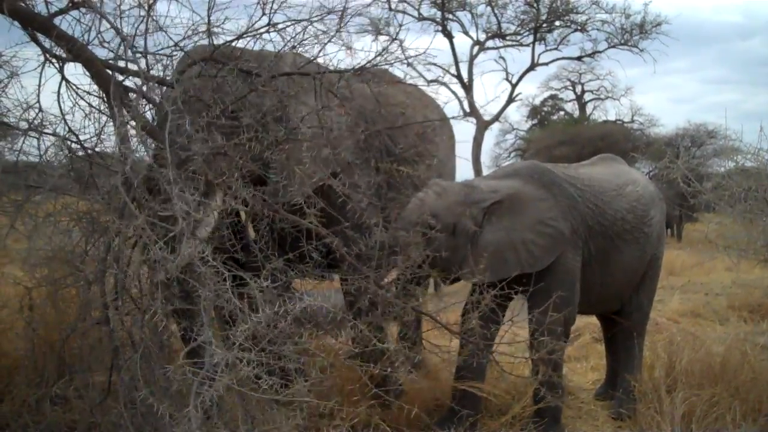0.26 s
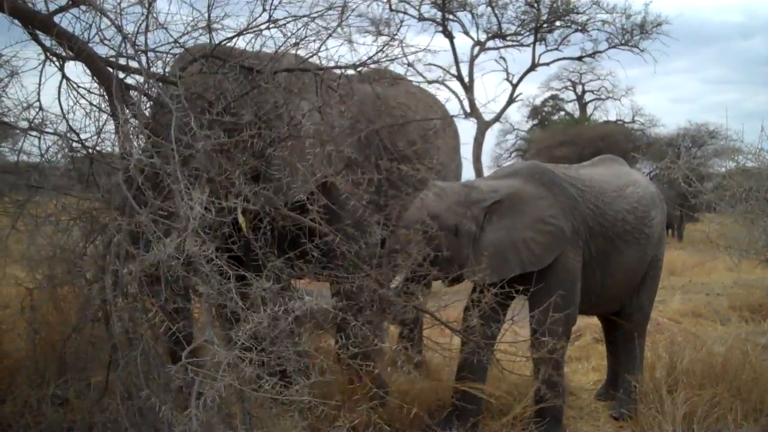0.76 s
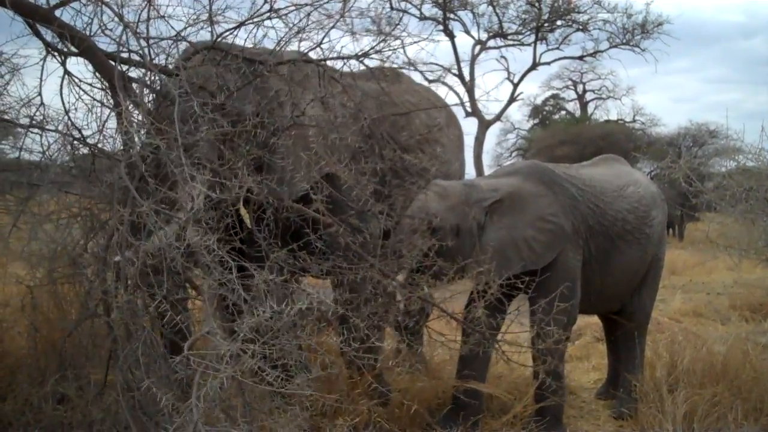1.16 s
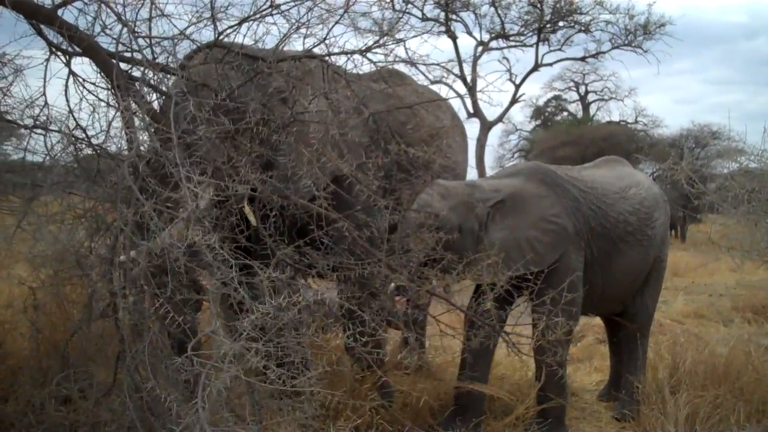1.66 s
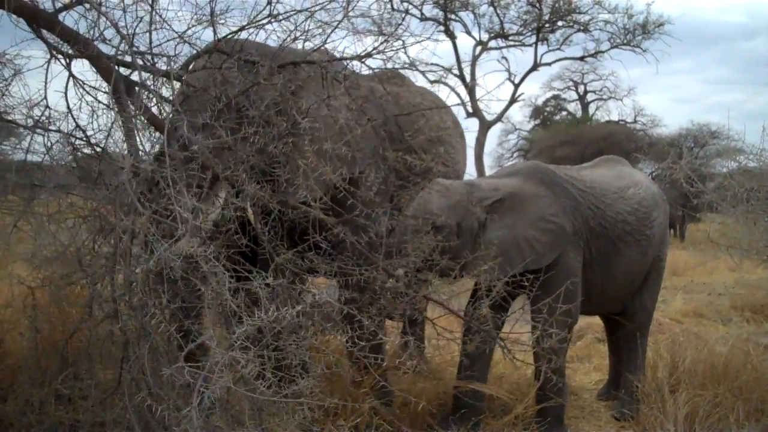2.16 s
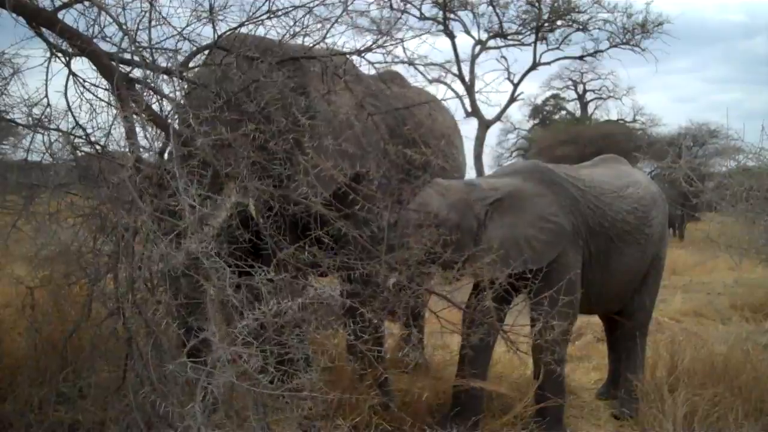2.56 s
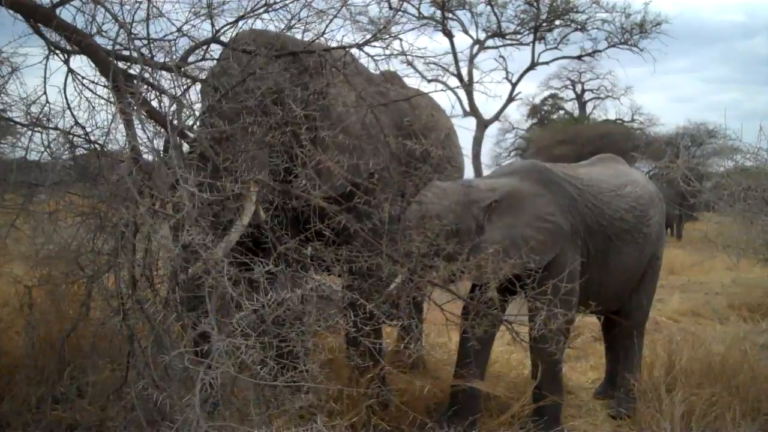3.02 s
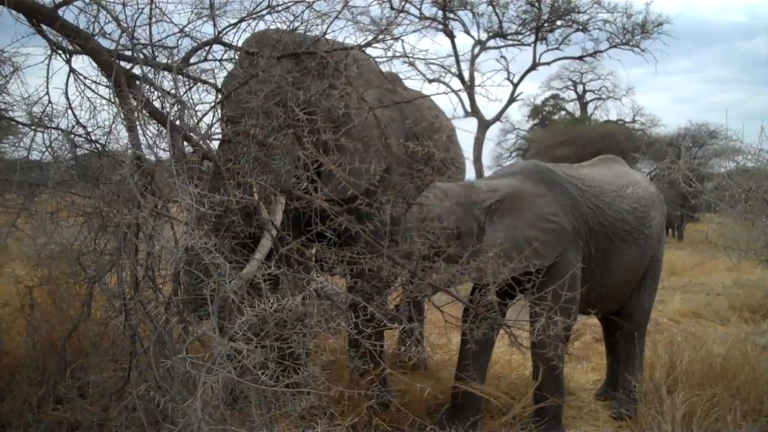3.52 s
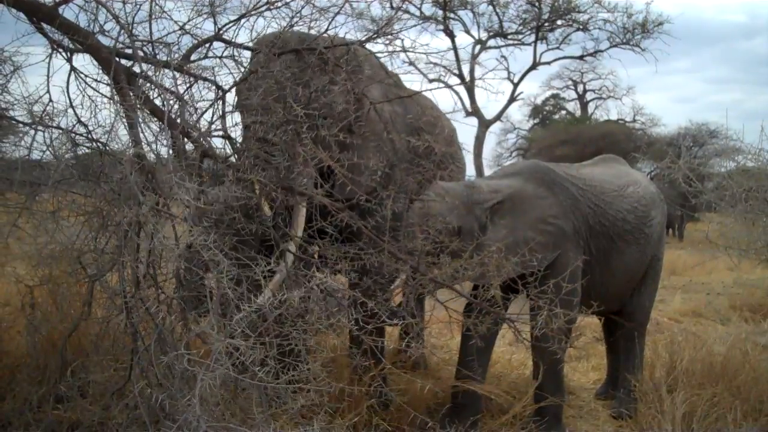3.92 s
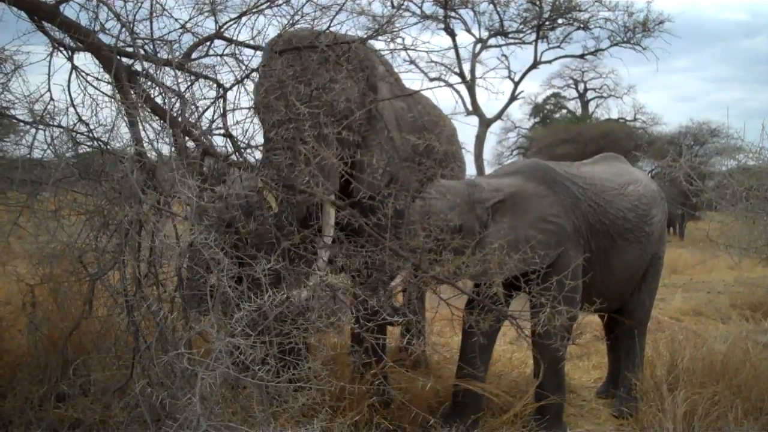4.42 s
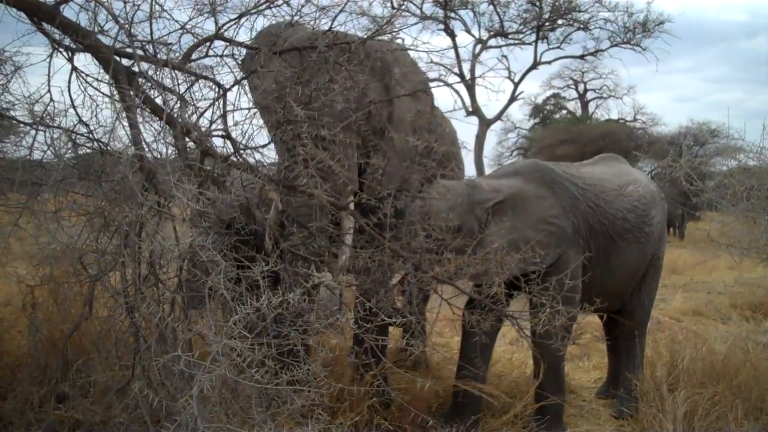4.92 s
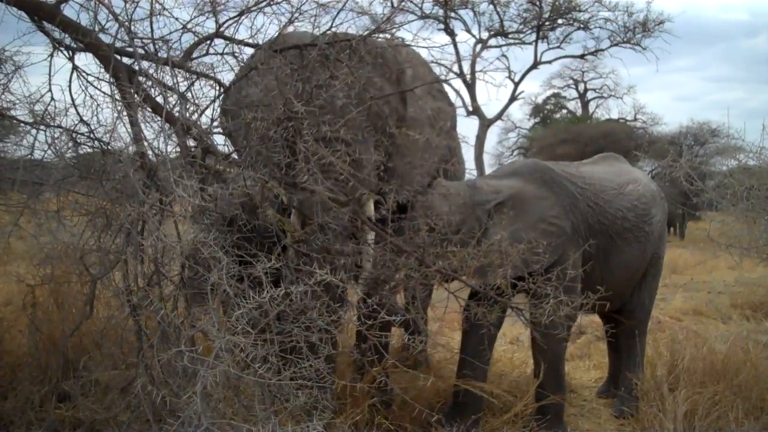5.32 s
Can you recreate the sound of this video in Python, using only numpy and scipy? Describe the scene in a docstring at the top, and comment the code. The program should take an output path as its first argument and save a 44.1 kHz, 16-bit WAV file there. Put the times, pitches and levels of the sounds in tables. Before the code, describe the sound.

Elephants feeding on a thorny bush: crisp snaps, scratchy branch rustling, occasional muffled crunches, and a light breeze softly buffeting the microphones.

```python
"""Elephants feeding on a dry thorn bush

Twigs crack and splinter over the rustle of dragged branches, with a few dull knocks of chewing.
Wood is excited by fracture impulses and scraping noise, and answers with brief resonances.
A light breeze bumps two microphones in open country; their ports each ring at their own treble pitch."""
import sys
import numpy as np
from scipy import signal
from scipy.fft import rfft, irfft
from scipy.io import wavfile
from scipy.ndimage import uniform_filter1d

SR = 44100
rng = np.random.default_rng(int(sys.argv[2]) if len(sys.argv) > 2 else 0)


def bounce(signal):
    """Save signal as a 16-bit WAV file at the path given by the first command-line argument."""
    frames = np.transpose(np.atleast_2d(signal))
    limited = np.clip(frames, -1, 1)
    pcm = np.round(limited * 32767).astype(np.int16)
    wavfile.write(sys.argv[1], SR, pcm)


N = 246078
TIME = np.arange(N) / SR

# How hard the branches are dragged. Each row: time in seconds, relative level in dB,
# brightness in dB per unit of the tilt curve.
DRAG_CURVE = [(0.0, -46, 1), (0.13, -44.5, 2), (0.42, -39.5, 3), (0.62, -42, 1.5), (0.73, -33.5, 2.5),
              (0.82, -37, 0), (0.9, -34.5, 3), (1.07, -41.5, 1.5), (1.27, -37.5, 3), (1.48, -38.5, 3),
              (1.68, -45.5, 1.5), (2.0, -42.5, 2), (2.3, -45, 3), (2.57, -46, 0), (3.07, -43, 3),
              (3.32, -46.5, 1), (3.43, -43.5, -0.5), (3.55, -49.5, 2), (3.88, -52, 2.5), (4.07, -53, -0.5),
              (4.13, -45, -2.5), (4.25, -54, 1.5), (4.39, -47, -0.5), (4.48, -50, -0.5), (4.77, -46, 0),
              (5.05, -44.5, 3.5), (5.25, -41, 3), (5.58, -39.5, 2)]
# Tilt curve of brightness, zero near 7 kHz. Each row: frequency in Hz, weight in nominal octaves.
TILT_CURVE = [(500, -1.2), (1500, -2.21), (5000, -0.54), (8000, 0.19), (14000, -0.12)]


def amp(db):
    """Level law: decibels to amplitude gain."""
    return 10 ** (np.asarray(db) / 20)


def evened(x):
    """Power normalisation: scales a signal to an rms of 1."""
    return x / np.sqrt(np.mean(x ** 2) + 1e-20)


def read(points, hz):
    """Interpolation of a spectrum on a log-frequency axis."""
    f, value = np.transpose(points)
    return np.interp(np.log(hz + 1), np.log(f), value)


def follow(rows):
    """Linear interpolation in time of each column of a curve table, at every sample."""
    s, *columns = np.transpose(rows)
    return [np.interp(TIME, s, c) for c in columns]


def add(mix, s, sound):
    """Superposition: mixes a sound in at s seconds, cut off at the end of the mix."""
    part = mix[..., max(round(s * SR), 0):][..., :sound.shape[-1]]
    part += sound[..., :part.shape[-1]]


def shaped(x, spectrum):
    """Linear filtering: multiplies the spectrum of a full-length signal by a gain curve."""
    return irfft(rfft(x) * amp(read(spectrum, np.fft.rfftfreq(N, 1 / SR))), N)


def drift(per_s):
    """Low-passed noise: smooth chance of rms 1 that changes about per_s times a second."""
    hz = np.fft.rfftfreq(N, 1 / SR)
    return evened(irfft(rfft(rng.standard_normal(N)) / (1 + (hz / per_s) ** 4), N))


def pair(shared, own, apart):
    """Partial coherence: two microphones share a noise, but for a power share apart."""
    apart = np.clip(apart, 0, 1)
    return np.sqrt(1 - apart) * shared + np.sqrt(apart) * own


def peak(hz, centre_hz, width_hz, db):
    """Damped resonance: response of one mode that stands db above a flat path."""
    return 1 + (amp(db) - 1) / (1 + 1j * (hz ** 2 - centre_hz ** 2) / (hz * width_hz))


def country(level_db=-60, waver_db=0.96):
    """Diffuse background: the soft, wavering air of open bush is noise of partial coherence."""
    # Each row: frequency in Hz, relative spectral level in dB.
    air_spectrum = [(20, -6), (60, -4), (160, 2.5), (250, 2.5), (380, 4.5), (700, 3), (1200, 1),
                    (2000, 2.5), (5000, -22), (14000, -89)]
    # Each row: frequency in Hz, left-right coherence from 0 to 1.
    air_coherence = [(30, 0.4), (120, 0.22), (300, 0.61), (1000, 0.44), (4000, 0), (12000, .2)]
    left, independent = rfft(rng.standard_normal((2, N)))
    same = np.clip(read(air_coherence, np.fft.rfftfreq(N, 1 / SR)), 0, 1)
    right = same * left + np.sqrt(1 - same ** 2) * independent
    air = irfft(np.array([left, right]), N)
    return evened(shaped(air, air_spectrum)) * amp(level_db + waver_db * drift(4.1))


def breeze(left_db=-8, right_db=5, buffet_s=0.043, lumpy_db=2.5, lumps_per_s=12):
    """Turbulent pressure: separate eddies bump each port, mostly the right one."""
    # Light breeze, rising and easing off. Each row: time in seconds, relative level in dB.
    breeze_curve = [(0.0, -62), (0.5, -63.5), (0.8, -67), (1.2, -56.5), (1.6, -70), (1.95, -71), (2.3, -59),
                    (2.7, -72), (3.3, -70.5), (3.8, -74), (4.6, -74), (5.58, -69)]
    # Single gusts. Each row: centre in seconds, relative peak in dB,
    # length in seconds from the centre to a fall by a factor of e^4.
    gusts = [(0.029, -50, 0.027), (0.25, -49.5, 0.046), (1.095, -48, 0.04), (1.174, -46.5, 0.054),
             (1.296, -55.5, 0.06), (1.715, -54, 0.075), (2.175, -40.5, 0.05), (2.255, -47.5, 0.064),
             (2.357, -53.5, 0.049), (2.44, -56, 0.04), (3.07, -56.5, 0.07), (3.3, -59, 0.11),
             (3.492, -57, 0.05), (4.9, -63, 0.13), (5.297, -51.5, 0.026), (5.432, -51, 0.04)]
    # Each row: frequency in Hz, relative spectral level in dB.
    buffet_spectrum = [(10, -27), (30, -3.5), (52, -1.5), (75, -8.5), (110, -12), (170, -22.5), (300, -46),
                       (800, -77)]
    strength = amp(follow(breeze_curve)[0] + lumpy_db * np.clip(drift(lumps_per_s), -2, 2))
    for s, db, length_s in gusts:
        bell = np.exp(-4 * ((TIME - s) / length_s) ** 2)
        strength = np.hypot(strength, amp(db) * bell)
    eddies = shaped(rng.standard_normal((2, N)), buffet_spectrum)
    # chance swells of the noise are mostly levelled, so the strength curve governs each bump
    power = uniform_filter1d(eddies ** 2, max(round(buffet_s * SR), 2), axis=1)
    levelled = eddies / np.sqrt(abs(power) + 0.1 * power.mean())
    return levelled * strength * amp([[left_db], [right_db]])


def thicket(x, wet_db=-17, t60=0.37, top_hz=9000, size=16000):
    """Sparse scattering: trunks, bodies and ground return a thin, decaying tail, duller above top_hz."""
    t = np.arange(size) / SR
    echoes = rng.random((2, size)) < 5000 / SR  # 5000 a second
    taps = rng.standard_normal((2, size)) * echoes * (t > .002) * amp(-60 * t / t60)
    taps /= np.linalg.norm(taps, axis=1, keepdims=True)
    taps = signal.lfilter(*signal.butter(2, top_hz, fs=SR), taps)
    return amp(wet_db) * signal.oaconvolve(x, taps, axes=1)[:, :N]


def chewing(level_db=-1, decay_s=0.018, rise_s=0.0015, width_hz=160, muffle_hz=1900, size=6000):
    """Cavity resonance: wood crushed in the mouth is a short muffled crunch through one broad mode."""
    # Each row: start in seconds, relative level in dB, pitch in Hz, wide crunch against the pitch in dB.
    chews = [(0.017, -50, 1050, -16.5), (0.073, -47, 940, 15.5), (0.118, -50, 400, -8),
             (1.837, -47, 830, -12), (2.021, -47.5, 657, -8), (2.552, -48.5, 525, -17),
             (2.744, -50, 1120, -11), (3.494, -42.5, 710, -9), (3.71, -55.5, 330, -14),
             (4.172, -53, 566, -21), (5.218, -48, 1130, -9)]
    out, t, hz = np.zeros(N), np.arange(size) / SR, np.fft.rfftfreq(size, 1 / SR)
    muffled = hz ** 2 / (hz ** 2 + 300 ** 2) / (1 + (hz / muffle_hz) ** 4)
    bite = (1 - np.exp(-t / rise_s)) * np.exp(-t / decay_s)
    for s, db, mouth_hz, crunch_db in chews:
        mode = 1 / (1 + ((hz - mouth_hz) / (width_hz / 2)) ** 2)
        colour = muffled * (mode + amp(crunch_db))
        random_phase = np.exp(2j * np.pi * rng.random(len(hz)))
        crunch = bite * irfft(random_phase * colour)
        add(out, s, amp(db + level_db) * crunch * np.linalg.norm(bite) / np.linalg.norm(crunch))
    return out


def boughs(level_db=-23, low_hz=300, high_hz=1700, rough_db=3.0, slips_per_s=30):
    """Friction noise: thick boughs rub dully and unevenly under the same drag."""
    band = signal.butter(2, [low_hz, high_hz], "bandpass", fs=SR)
    rub = signal.lfilter(*band, rng.standard_normal(N))
    uneven = evened(rub * amp(rough_db * drift(slips_per_s)))
    return uneven * amp(follow(DRAG_CURVE)[0] + level_db)


def wood_click(tilt_db, ring_hz, ring_db, sharpness, lag_s=1.8e-5, size=512):
    """Impulse response: a dry fibre clicks in a ringing twig, at two microphones, with left energy 1."""
    # Each row: frequency in Hz, relative spectral level in dB.
    dry_wood = [(20, -37), (100, -16.5), (400, -17), (900, -6), (1400, -9.5), (1900, -4.5), (2600, 0.5),
                (3400, 1.5), (4300, 0.5), (6000, 1), (8200, 0), (10000, -3), (14000, -4)]
    hz = np.fft.rfftfreq(size, 1 / SR) + 1e-3
    log_gain = np.log(amp(read(dry_wood, hz) + tilt_db * read(TILT_CURVE, hz)))
    # minimum phase puts the energy at the onset
    mirrored = np.r_[log_gain, log_gain[-2:0:-1]]
    causal = np.exp(signal.hilbert(mirrored).conj())[:len(hz)]
    # each twig lies in its own direction, so one microphone hears it slightly sooner
    delay = 4 / SR + lag_s * rng.standard_normal() * np.array([[-.5], [.5]])
    ring = peak(hz, ring_hz, ring_hz / sharpness, ring_db)
    click = irfft(causal * ring * np.exp(-2j * np.pi * hz * delay))
    return click / np.linalg.norm(click[0])


def rustle(level_db=0.36, clump_db=1.45, own_clump_db=2.0, clumps_per_s=55, apart=0.019, count=18):
    """Granular excitation: thorns and twiglets of each pitch tick in clumps over a fine scraping."""
    # Share of the rustle that each pitch carries. Each row: pitch in Hz, relative level in dB.
    twiglets = [(1700, -6), (2500, -4.5), (3400, -1.5), (4500, -0.5), (6300, -1.5), (8000, 1),
                (10000, -2.5), (13500, -1.5)]
    ticks_per_s, spread_db, scrape = 4200, 2.3, .7  # the tick rate is for all pitches together
    ring_db, sharpness = 24, 8
    drag_db, bright_db = follow(DRAG_CURVE)
    out, clumps = np.zeros((2, N)), drift(clumps_per_s)
    for ring_hz in np.geomspace(1700, 13500, count):
        octaves = read(TILT_CURVE, ring_hz)
        ticking = rng.random(N) < ticks_per_s / count / SR
        sizes = amp(spread_db * np.minimum(rng.exponential(1, ticking.sum()), 4))
        ticks = np.zeros(N)
        ticks[ticking] = rng.choice([-1, 1], len(sizes)) * sizes
        fine = pair(rng.standard_normal(N), rng.standard_normal((2, N)), apart)
        clumping = amp(clump_db * clumps + own_clump_db * drift(clumps_per_s))
        grains = evened((evened(ticks) + scrape * fine) * clumping)
        # a bright drag favours the thin, high twiglets
        grains = grains * amp(read(twiglets, ring_hz) + 1.08 * bright_db * octaves)
        click = wood_click(octaves, ring_hz, ring_db, sharpness)
        out += signal.oaconvolve(grains, click, axes=1)[:, :N]
    return out * amp(drag_db + level_db) / np.sqrt(count)


def flicks(level_db=-1.0, decay_s=0.0051, rise_s=0.00048, buzz=.7, size=2600):
    """Modal ringing: a freed thin twig rings on one mode, kept going by chatter against its neighbours."""
    # Each row: start in seconds, relative peak in dB, pitch in Hz.
    freed_twigs = [(1.536, -35, 3360), (3.17, -32.5, 4500), (3.259, -38, 3050), (3.748, -48.5, 4240)]
    out, t = np.zeros(N), np.arange(size) / SR
    dying = np.exp(-t / decay_s)
    for s, db, hz in freed_twigs:
        mode = np.sin(2 * np.pi * hz * t) * dying * (1 - np.exp(-t / rise_s))
        knocks = rng.standard_normal(size) * (rng.random(size) < 500 / SR)  # 500 a second
        chatter = (t == 0) + buzz * knocks * dying
        ring = signal.fftconvolve(chatter, mode)
        add(out, s, amp(db + level_db) * ring / abs(ring).max())
    return out


def small_snaps(crack_db=18, splinter_db=17, spread_db=4.5, tilt_db=0.0, tilt_spread_db=2.5,
                low_hz=1700, high_hz=10000, count=80):
    """Failure under strain: lesser twigs break louder and more often when the drag is harder."""
    level_db = follow(DRAG_CURVE)[0]
    strain = np.cumsum(amp(level_db))
    slot, pitch = rng.random((count, 2)).T
    # equal steps of accumulated strain, each with one break at a random point
    when = np.interp((np.arange(count) + slot) / count, strain / strain[-1], TIME)
    crack, splinter, tilt = np.clip(rng.standard_normal((count, 3)), -2, 2).T
    drag_db = np.interp(when, TIME, level_db)
    first_db = drag_db + crack_db + spread_db * crack
    after_db = drag_db + splinter_db + spread_db * splinter
    bright_db = tilt_db + tilt_spread_db * tilt
    ring_hz = low_hz * (high_hz / low_hz) ** pitch
    return list(zip(when, first_db, after_db, bright_db, ring_hz))


def snaps(crack_db=-2.0, splinter_db=0, fibres_per_s=2200, fray=0.55, tear_s=0.00043, tear=0.49,
          apart=0.059, crack_tilt_db=8.0, crack_top_hz=10500, branch_db=-13, branch_s=0.022,
          branch_hz=2200, size=2200):
    """Brittle fracture: a sharp crack, then a dying run of fibres letting go, while the branch shudders."""
    # The loudest breaking twigs. Each row: start in seconds, relative energy of the crack in dB,
    # relative energy of the splintering in dB, brightness in dB per unit of the tilt curve, ring in Hz.
    loud_snaps = [(0.0745, -15, -13.5, 6, 1700), (0.4404, -5.5, -9.5, 1, 7750), (0.4949, -18, -16, 3, 1400),
                  (0.5404, -9, -10, 0, 7100), (0.6077, -17, -20, -5, 5200), (0.6912, -9, -12, 13, 7400),
                  (0.7094, -8, -3, 6.5, 3260), (0.7318, -9, -5.5, 3.5, 1880), (0.7459, -18, -4.5, 4, 2500),
                  (0.8211, -8, -10.5, 0, 3120), (0.8642, -15, -13, 3, 3100),
                  (0.8799, -11.5, -5, 1.5, 10400), (1.0205, -16, -9, 2.5, 3450),
                  (1.162, -6.5, -14, 3, 4600), (1.2349, -6.5, -14.5, 3.5, 4060),
                  (1.2776, -11.5, -8, 2.5, 6230), (1.356, -12.5, -16, 3, 3080),
                  (1.372, -2.5, -3, 3.5, 2030), (1.379, -7.5, -29, -6, 3000), (1.4748, -8, -5.5, 5, 8500),
                  (1.4836, -10, -2.5, 10, 1900), (1.5356, -11, -8.5, 9, 3300),
                  (1.5645, -17, -9.5, 2.5, 3270), (1.7987, -12, -10.5, 2, 6500),
                  (1.9229, -15, -16, 7, 1800), (1.9884, -10.5, -17.5, 2, 7750),
                  (2.0189, -15, -16.5, 1.5, 6500), (2.1122, -25, -13, 6, 8700),
                  (2.271, -13.5, -17, 2, 6550), (2.3222, -21, -18.5, 0.5, 4630),
                  (2.4077, -10.5, -11, 7.5, 3840), (2.465, -24.5, -15.5, 6, 1300),
                  (2.675, -11, -6, 1, 2460), (2.816, -19, -19, 24, 8700),
                  (2.968, -16.5, -14.5, -0.5, 12100), (3.0401, -10, -11.5, 1, 6500),
                  (3.063, -14, -7.5, 1, 5100), (3.2141, -6, -12, 3, 4600), (3.232, -25.5, -9, 3.5, 1280),
                  (3.6221, -6.5, -17.5, 3, 7000), (3.7568, -23, -27, 1, 1800),
                  (3.983, -14.5, -20, -3, 12300), (3.9917, -7.5, -9.5, -1, 12200),
                  (4.082, -14, -12.5, 5.5, 1700), (4.0913, -19, -5.5, 5.5, 4000),
                  (4.1026, -4.5, -11, 7.5, 3800), (4.1232, -25, -8.5, 3, 4860),
                  (4.1461, -15, -13.5, 2, 9100), (4.1714, -18.5, -18.5, -4.5, 2170),
                  (4.2625, -15, -19, 0.5, 6500), (4.3051, -10, -12, 2, 2630), (4.348, -17, -28, 1, 6900),
                  (4.365, -4.5, -6.5, 5.5, 7600), (4.392, -9, -13, 1.5, 7500), (4.416, -10, -12, 0.5, 4700),
                  (4.4955, -13.5, -12.5, 2, 2820), (4.5471, -17, -21, -4.5, 1770),
                  (4.5749, -7, -8.5, 6, 3680), (4.623, -27.5, -12.5, -1, 7300), (4.675, -16, -16, 1, 6500),
                  (4.7298, -24, -6.5, 2.5, 1700), (4.8144, -13.5, -10, 1, 2370),
                  (4.8609, -16, -18, -4.5, 2010), (4.8867, -15.5, -12.5, 2, 2200),
                  (4.9294, -34.5, -12.5, -2, 2040), (4.993, -21, -8, 2, 2100), (5.0937, -14, -8, -4, 4000),
                  (5.3258, -5, -7.5, 3, 2530), (5.4226, -24.5, -14, -1, 1640), (5.5518, -22, -5, 5, 7200)]
    ring_db, sharpness = 9, 7
    # brittle twigs part at once; tough ones, whose splintering outweighs the crack, tear for longer
    even_splinter_s, doublings_per_db = 0.0073, 0.045
    out, t = np.zeros((2, N)), np.arange(size) / SR
    thick_wood = signal.butter(2, [700, branch_hz], "bandpass", fs=SR)
    fracture_time = signal.butter(2, crack_top_hz, fs=SR)
    for s, first_db, after_db, tilt_db, ring_hz in loud_snaps + small_snaps():
        splinter_s = even_splinter_s * 2 ** (doublings_per_db * (after_db - first_db))
        noise, chance = rng.standard_normal((5, size)), rng.random(size)
        tearing = tear * noise[3] * np.exp(-t / tear_s)
        crack = signal.lfilter(*fracture_time, tearing + (t == 0))
        run = ((chance < fibres_per_s / SR) + fray) * np.exp(-t / splinter_s) * (t > .001)
        fibres = pair(noise[0], noise[1:3], apart) * run
        shudder = signal.lfilter(*thick_wood, noise[4] * np.exp(-t / branch_s))
        # the crack is brighter than its fibres; thin, bright twigs barely shake the branch
        parts = [(crack, first_db + crack_db, tilt_db + crack_tilt_db),
                 (fibres, after_db + splinter_db, tilt_db),
                 (shudder, after_db + branch_db - 1.8 * tilt_db, 0)]
        for force, db, bright_db in parts:
            click = wood_click(bright_db, ring_hz, ring_db, sharpness)
            sound = signal.fftconvolve(np.atleast_2d(force), click, axes=1)
            add(out, s, amp(db) * sound / np.linalg.norm(sound[0]))
    return out


def scene():
    """Superposition: the feeding animals, their scattered tail in the thicket, and the air around."""
    feeding = snaps() + rustle() + boughs() + flicks() + chewing()
    return feeding + thicket(feeding) + country() + breeze()


def record(dry):
    """Port resonance and band limit: each port rings, the right is duller, the band ends steeply."""
    # Microphone ports, left then right. Each row: resonance in Hz, width in Hz, height in dB.
    ports = [(7747, 1090, 13), (6500, 607, 14)]
    # Gain of the duller right microphone. Each row: frequency in Hz, gain in dB.
    right_colour = [(1000, -1), (6500, 0.5), (8000, -4.5), (10000, -4), (12000, -14), (14000, -15)]
    edge_hz = 14250
    hz = np.fft.rfftfreq(N, 1 / SR) + 1e-3
    left, right = irfft(rfft(dry) * np.array([peak(hz, *port) for port in ports]), N)
    both = np.array([left, shaped(right, right_colour)])
    low_pass = signal.firwin(511, edge_hz, window=("kaiser", 8), fs=SR)
    return signal.oaconvolve(both, low_pass[None], "same", axes=1)


dry = scene()
out = record(dry)
bounce(out)
```